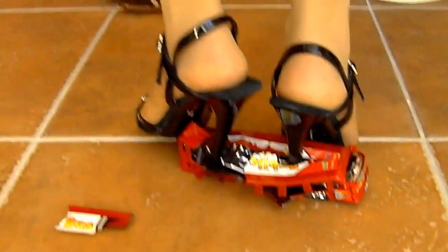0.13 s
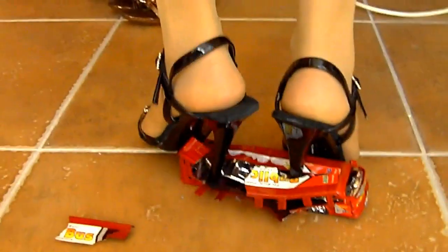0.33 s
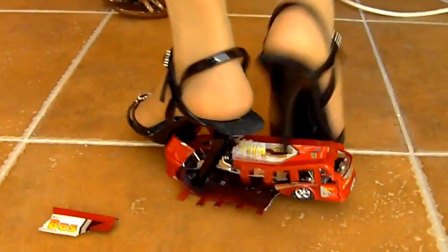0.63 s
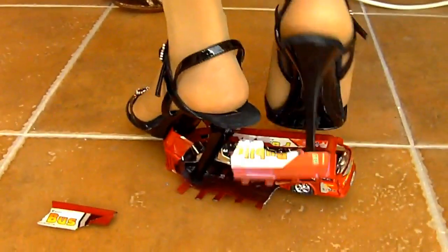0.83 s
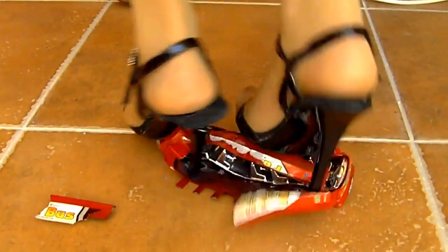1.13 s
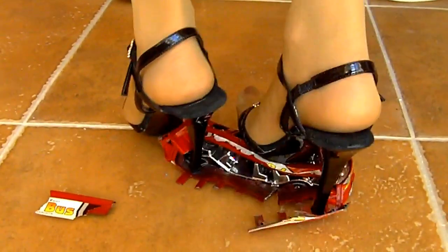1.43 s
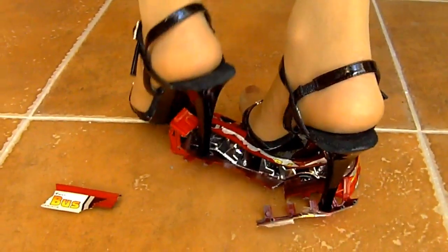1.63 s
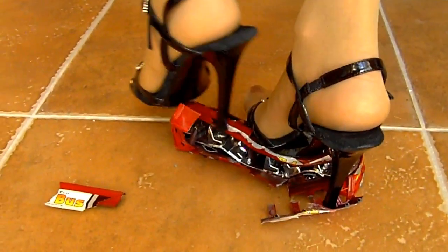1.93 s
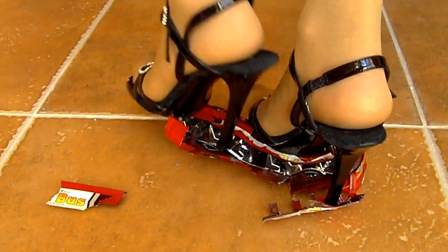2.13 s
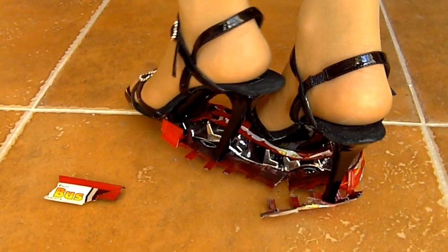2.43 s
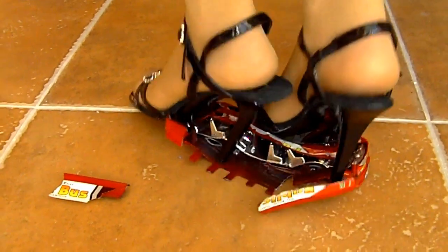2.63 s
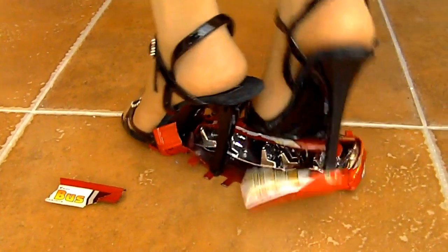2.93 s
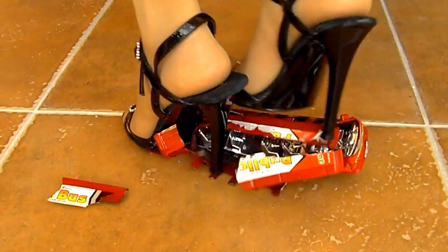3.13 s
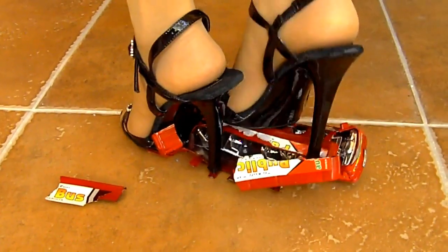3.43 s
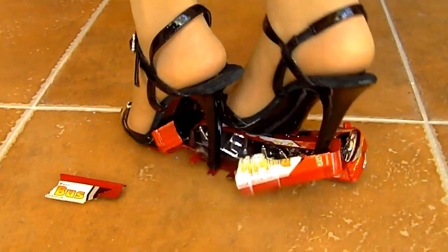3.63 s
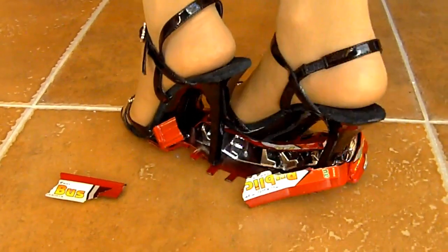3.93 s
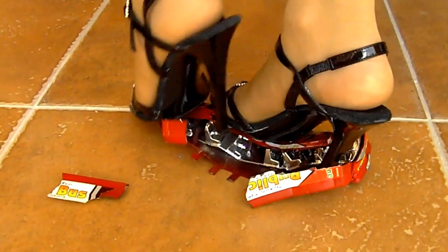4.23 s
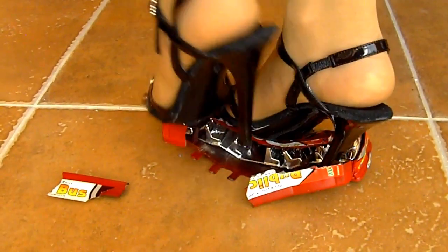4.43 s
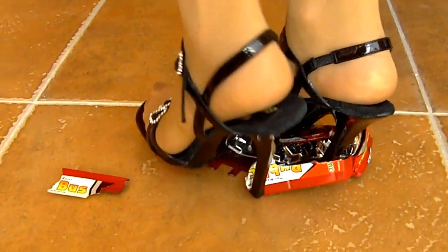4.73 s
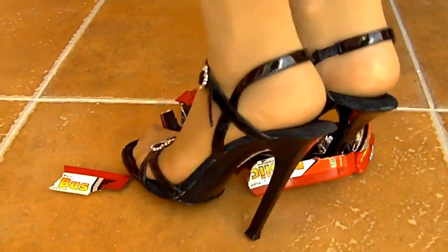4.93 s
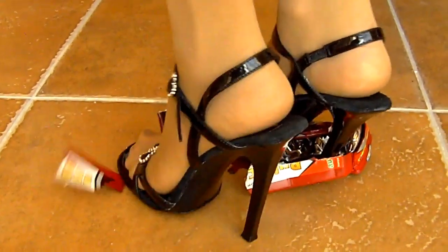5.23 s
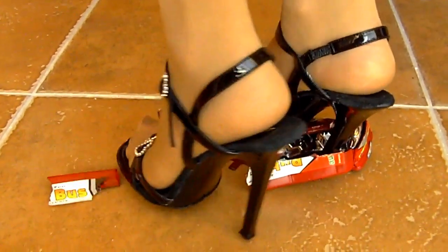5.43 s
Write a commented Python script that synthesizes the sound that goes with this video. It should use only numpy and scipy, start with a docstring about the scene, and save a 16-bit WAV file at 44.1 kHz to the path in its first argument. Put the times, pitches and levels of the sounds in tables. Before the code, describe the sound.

Over a faint mains buzz and fading room ring, a hollow plastic toy is crushed by high heels on tiles. Very loud, clipped cracks burst out near the start, then creaks and smaller snaps, another violent cluster midway, and dwindling crackles. A shoe knocks the floor late and a loose piece skids briefly. Close microphone, bare reverberant room, dull top end.

```python
"""A dying room ring is heard first, over a faint mains buzz; then high-heeled shoes tread a hollow plastic
toy bus to pieces on a tiled floor, close by. Stick-slip makes the shell creak, and sudden stress release
makes it crack, exciting its modes; the loudest cracks overload the input stage. Pieces scrape by random
friction, shoes knock as struck modal bodies, and the bare room answers with echoes and about a second of ring."""
import sys
import numpy as np
from scipy import signal
from scipy.fft import rfft, irfft, next_fast_len
from scipy.io import wavfile

SR = 44100
rng = np.random.default_rng(int(sys.argv[2]) if len(sys.argv) > 2 else 0)


def materialize(psi):
    """Save the field psi as 16-bit PCM at rate SR to the path in sys.argv[1].

    A 1-D psi becomes a single channel; in a 2-D psi each row is a channel.
    """
    bounded = np.clip(np.atleast_2d(psi).T, -1, 1)
    quanta = np.round(bounded * 32767).astype(np.int16)
    wavfile.write(sys.argv[1], SR, quanta)


N = 246078
TAPS = 4096  # length of filters and single blows [samples]
HZ = np.fft.rfftfreq(TAPS, 1 / SR)  # frequency grid of the filters
TIME = np.arange(N) / SR
BLOW_TIME = np.arange(TAPS) / SR

# Spectrum of a crack: (frequency [Hz], gain [dB])
CRACK_COLOUR = [(40, -24), (130, -23), (300, -14), (600, -8.5), (1200, -0.5), (2300, 5.5), (5000, 1),
                (9000, -24.5)]
# Modes of the plastic shell: (frequency [Hz], strength [dB], 60 dB decay time [s])
SHELL_MODES = [(890, -11, 0.032), (1278, 3.5, 0.13), (1472, 2, 0.1), (1750, 2, 0.025), (1940, -3, 0.036),
               (2260, 0.5, 0.019), (2340, 8, 0.027), (2620, -28, 0.01), (3216, 18, 0.046),
               (3530, 15.5, 0.031), (3870, -8, 0.0046), (4780, -5.5, .018), (5000, -7, 0.015)]
# Response of the microphone: (frequency [Hz], gain [dB])
MICROPHONE_GAIN = [(20, 4), (5000, -3), (5450, -5), (5950, -11), (6400, -43), (6900, -68.5), (8000, -85)]


def amp(db):
    """Level law: converts decibels to an amplitude ratio."""
    return 10 ** (np.asarray(db) / 20)


def evened(x):
    """Power normalization: scales to rms 1."""
    return x / np.sqrt(np.mean(x ** 2) + 1e-20)


def blow(x):
    """Energy normalization: scales to the energy of one millisecond at rms 1."""
    return x / np.sqrt(np.sum(x ** 2) * 1000 / SR)


def blow_at_microphone(x):
    """Energy normalization as for a blow, but of the part that passes the microphone."""
    return x * np.sqrt(SR / 1000) / np.linalg.norm(microphone(x))


def impulse():
    """Impulsive excitation: one sample, equally strong at all frequencies."""
    return blow(1. * (BLOW_TIME == 0))


def noise_burst(fade_s):
    """Irregular excitation: noise whose amplitude decays exponentially."""
    return blow(rng.standard_normal(TAPS) * np.exp(-BLOW_TIME / fade_s))


def read(points, hz):
    """Interpolation of (frequency [Hz], value) points on a logarithmic frequency axis."""
    f, value = np.transpose(points)
    return np.interp(np.log(hz + 1), np.log(f + 1), value)


def add(mix, s, sound):
    """Superposition: mixes a sound in from time s."""
    part = mix[max(round(s * SR), 0):][:len(sound)]
    part += sound[:len(part)]


def coloured(x, db):
    """Minimum-phase filtering: a causal response with the gains db on the HZ grid."""
    cepstrum = irfft(np.log(amp(db)))
    # folding the cepstrum onto positive times makes the response causal
    cepstrum[1:TAPS // 2] *= 2
    cepstrum[TAPS // 2 + 1:] = 0
    response = irfft(np.exp(rfft(cepstrum)))
    return signal.oaconvolve(x, response)[:len(x)]


def ring(modes, spread):
    """Modal superposition: damped cosines whose strengths and pitches vary from blow to blow."""
    hz, db, t60 = np.transpose(modes)[:, :, None]
    strength, detune = rng.standard_normal((2, len(modes), 1))
    decay = amp(db - 60 * BLOW_TIME / t60)
    wave = np.cos(2 * np.pi * hz * (1 + 0.0061 * detune) * BLOW_TIME)
    return blow(((1 + spread * strength) * decay * wave).sum(0))


def resonance(hz, width_octaves=0.23):
    """Resonance of one piece of plastic: a Gaussian peak in log frequency, 0 to 1."""
    return np.exp(-.5 * (np.log2((HZ + 1) / hz) / width_octaves) ** 2)


def friction(colour, grains_per_s, uneven_db):
    """Random micro-slip: tiny slips of either sign as plastic moves over the tiles, at rms 1."""
    size = amp(uneven_db * np.minimum(rng.exponential(1, N), 4))
    slips = (rng.random(N) < grains_per_s / SR) * rng.choice([-1, 1], N) * size
    return evened(coloured(slips, read(colour, HZ)))


def microphone(x):
    """Zero-phase band limitation: a speech band with a steep treble cut, symmetric in time."""
    size = next_fast_len(len(x) + TAPS)
    gain = amp(read(MICROPHONE_GAIN, np.fft.rfftfreq(size, 1 / SR)))
    return irfft(rfft(x, size) * gain, size)[:len(x)]


def electronics(buzz_db=-47, pulse_s=0.0004, hiss_db=-62):
    """Periodic interference: one two-sided exponential pulse per mains cycle, over a soft hiss."""
    # Spectrum of the hiss: (frequency [Hz], gain [dB])
    hiss_colour = [(20, -3.5), (60, -10.5), (200, 3.5), (400, -9), (1500, -10.5), (4500, -11), (9000, -29)]
    mains_hz, first_s = 59.95, .0034
    offset = (((TIME - first_s) * mains_hz + .5) % 1 - .5) / mains_hz  # time from the nearest pulse
    pulses = np.exp(-abs(offset) / pulse_s)
    buzz = amp(buzz_db) * (pulses - pulses.mean())
    hiss = evened(coloured(rng.standard_normal(N), read(hiss_colour, HZ)))
    return buzz + amp(hiss_db) * hiss


def room_tail(build_s=0.027):
    """Diffuse reverberation: dense reflections build up and die away, each band at its own rate."""
    # Decay of the room: (frequency [Hz], 60 dB decay time [s])
    decay_times = [(150, 0.76), (400, 0.93), (1000, 1.1), (2500, 0.82), (5500, 0.78)]
    # Strength of the tail: (frequency [Hz], level against the direct sound before T60 and build-up act [dB])
    tail_levels = [(100, -3.5), (220, -11), (500, -10), (1100, -12), (2100, -10.5), (3300, -11.5),
                   (5500, -14)]
    hz, t, z = signal.stft(rng.standard_normal(SR * 5 // 4), SR, nperseg=256)
    t60 = read(decay_times, hz)[:, None]
    level = read(tail_levels, hz)[:, None] - 60 * t / t60
    tail = signal.istft(z * amp(level), SR, nperseg=256)[1]
    onset = 1 - np.exp(-(np.arange(len(tail)) / SR / build_s) ** 2)
    return tail * onset * np.sqrt(2 * np.log(1000) / SR)  # unit energy for a 1 s decay at 0 dB


def room(near, far, scatter_db=-12, scatter_s=0.0069, scatter_start_s=0.0032,
         legs_db=-10, legs_s=0.0052, legs_width_s=0.00062):
    """Reflection and scattering: near echoes, a rough one off the legs, furniture scatter, long ring."""
    # Echoes off the floor and things nearby: (delay [s], level [dB])
    near_echoes = [(.0009, -36), (.0043, -19), (.0050, -23), (.0064, -31), (.0082, -19.5)]
    out = near.copy()
    for delay, db in near_echoes:
        add(out, delay, amp(db) * near)
    for beam in far:
        scatter = rng.standard_normal(TAPS) * np.exp(-BLOW_TIME / scatter_s)
        scatter *= BLOW_TIME > scatter_start_s
        legs = rng.standard_normal(TAPS) * np.exp(-.5 * ((BLOW_TIME - legs_s) / legs_width_s) ** 2)
        early = amp(scatter_db) * scatter / np.linalg.norm(scatter)
        early += amp(legs_db) * legs / np.linalg.norm(legs)
        paths = room_tail()
        add(paths, 0, early)
        out += signal.fftconvolve(beam, paths)[:N]
    return out


def earlier_ring(db=-43):
    """Free decay: the room is still ringing from a crack a moment before."""
    tail = coloured(microphone(room_tail()), read(CRACK_COLOUR, HZ))
    tail = tail[SR // 10:]  # the first 0.1 s has already passed
    out = np.zeros(N)
    add(out, 0, amp(db) * tail / tail[:TAPS].std())
    return out


def thuds(hz=85, width_octaves=1.0, fade_s=.014):
    """Overdamped impact: a foot takes the weight with a soft, low push that does not ring."""
    # Weight coming down on the floor: (time [s], level [dB])
    footfalls = [(0.293, -43), (2.628, -26.5), (3.581, -33.5)]
    out = np.zeros(N)
    colour = np.maximum(-3 * (np.log2((HZ + 1) / hz) / width_octaves) ** 2, -60)
    for s, db in footfalls:
        add(out, s, amp(db) * blow(coloured(noise_burst(fade_s), colour)))
    return out


def steps(click_db=-4, click_s=0.013, low_hz=80):
    """Contact-limited impact: sole and heel modes knock on the tiles, dulled by a soft contact."""
    # Blows of a shoe: (time [s], level [dB], frequency above which the contact dulls it [Hz])
    shoe_blows = [(2.643, -19.5, 1500), (3.5827, -35, 400), (4.624, -42, 900), (4.809, -34.5, 600),
                  (4.845, -15, 1800), (5.5429, -25.5, 2500)]
    # Modes of the shoe: (frequency [Hz], strength [dB], 60 dB decay time [s])
    shoe_modes = [(110, -30.5, .06), (195, -2, 0.017), (370, 5.5, 0.0083), (558, 8, 0.03),
                  (816, 5.5, 0.0053), (1277, 7, 0.055), (1950, 13, 0.0042)]
    out = np.zeros(N)
    low_loss = 1 + (low_hz / (HZ + 1)) ** 2  # a small heel radiates little bass
    for s, db, dull_hz in shoe_blows:
        knock = ring(shoe_modes, spread=0.18) + amp(click_db) * noise_burst(click_s)
        contact_loss = 1 + (HZ / dull_hz) ** 2
        add(out, s, amp(db) * blow(coloured(knock, -10 * np.log10(contact_loss * low_loss))))
    return out


def skating(ramp_s=.02):
    """Sliding friction: a kicked panel sets off quickly, slows down on the glaze and stops."""
    # Slides of the loose panel: (start [s], level [dB], fade [dB/s], length [s])
    slides = [(3.285, -44.5, 51, 0.18), (5.264, -47, 72.5, 0.115)]
    # Spectrum of the slide: (frequency [Hz], gain [dB])
    slide_colour = [(500, -27), (1500, -27), (2800, -3), (4400, 11), (5200, -2.5), (9000, -27)]
    speed = np.zeros(N)
    for start, db, fade, length in slides:
        t = np.arange(0, length, 1 / SR)
        ends = np.minimum(np.minimum(t, length - t) / ramp_s, 1)
        add(speed, start, ends * amp(db - fade * t))
    return speed * friction(slide_colour, grains_per_s=4400, uneven_db=8.5)


def grinding(steepness=5.0):
    """Sliding friction: each stroke of a sole swells and dies symmetrically; the shorter, the more abrupt."""
    # Plastic dragged under a sole: (middle [s], length between half-amplitude points [s], level [dB])
    strokes = [(0.491, .03, -50), (1.18, .12, -35.5), (1.43, .04, -47), (1.779, .03, -38),
               (2.189, .05, -42.5), (2.354, .09, -49), (3.556, .06, -42.5), (3.74, .12, -46),
               (3.994, .05, -55), (4.62, .15, -38), (4.812, .028, -19.5), (4.861, .08, -52),
               (5.56, 0.049, -47)]
    # Spectrum of the drag: (frequency [Hz], gain [dB])
    drag_colour = [(60, -21), (200, -3), (750, -13.5), (1220, 3), (1600, 2), (2300, 3.5), (3500, -2),
                   (5000, -1), (9000, -7.5)]
    speed = np.zeros(N)
    for middle, length, db in strokes:
        speed += amp(db) / (1 + abs(2 * (TIME - middle) / length) ** steepness)
    return speed * friction(drag_colour, grains_per_s=1300, uneven_db=0.0)


def creaks(uneven_db=4.0, shell_db=-10, rub_db=-1, rub_s=.0012,
           spot_hz=2300, spot_octaves=0.73, spot_db=7, wall_hz=1180):
    """Stick-slip: plastic catches and slips on plastic; each slip rubs a new spot and rings the shell."""
    # Creaks of the loaded shell: (start [s], end [s], level of a slip [dB], slip rate [1/s],
    # looseness of the pace [std of log interval], ring of the side wall [dB])
    creak_runs = [(1.416, 1.441, -25, 150, 0.15, 0), (2.153, 2.23, -34.5, 86, 0.29, 10),
                  (2.289, 2.382, -26, 140, .12, 7), (2.379, 2.465, -33.5, 110, 0.22, -8),
                  (2.533, 2.572, -29.5, 110, 0.21, 6), (2.574, 2.588, -27.5, 420, 0.23, 10),
                  (3.464, 3.547, -35, 113, 0.23, 8), (3.781, 3.83, -42, 140, 0.18, -2),
                  (3.873, 3.975, -28.5, 43.6, 0.014, 10), (3.97, 4.05, -32, 66, 0.22, 1.5),
                  (4.1, 4.148, -27.5, 220, .12, 5.5), (4.152, 4.195, -24, 64, .03, 17.5),
                  (4.521, 4.62, -32, 142, 0.26, 8), (4.721, 4.777, -32, 155, 0.099, -3)]
    # Spectrum of a slip: (frequency [Hz], gain [dB])
    creak_colour = [(100, -31), (700, -15), (1220, -7), (1550, -3), (1950, -2.5), (2600, 2.5), (3300, -3),
                    (5000, -2), (9000, -9)]
    out = np.zeros(N)
    for start, end, db, rate, loose, wall_db in creak_runs:
        wait, size, spot = rng.standard_normal((3, 24))  # at most 24 slips
        gaps = np.exp(loose * wait) / rate
        times = start + np.cumsum(gaps) - gaps
        knock = impulse() + amp(shell_db) * ring(SHELL_MODES, spread=0.65)
        colour = read(creak_colour, HZ) + read(MICROPHONE_GAIN, HZ) + wall_db * resonance(wall_hz)
        for k in np.flatnonzero(times < end):
            force = knock + amp(rub_db) * noise_burst(rub_s)
            spot_ring = spot_db * resonance(spot_hz * 2 ** (spot_octaves * spot[k]))
            slip = blow(coloured(force, colour + spot_ring))
            add(out, times[k], amp(db + uneven_db * size[k]) * slip)
    return out


def cracks(shell_db=-13, splinter_db=3, splinter_s=0.001, onward_db=3):
    """Sudden stress release: a snap and splinters ring the shell and the freed piece.
    Gives the sound at the microphone and what goes out into the room in three directions."""
    # Cracks of the shell: (time [s], level [dB], pitch of the freed piece [Hz], its ring [dB],
    # hollow-body gain, 0.99 of it below 700 Hz [dB], sharp-edge gain, 0.9 of it above 4200 Hz [dB])
    breaks = [(0.1403, -34, 4340, 10.5, 2, -9), (0.4929, -32.5, 2460, 10, 5, -6),
              (0.5108, 4, 2260, 3, 1.5, 4.5), (0.5134, -0.5, 2250, 0.5, 0.5, 0.5),
              (0.5175, -3.5, 2300, 7, 0, -9), (0.679, -22, 960, 13, 0, -9), (0.9898, -1, 2920, 14, 6, 3),
              (0.9922, 1, 2000, 10, -2, 5.5), (1.075, -1.5, 1970, 6.5, -2, 3),
              (1.1459, -14.5, 2520, 23, 0, -2), (1.1597, -9, 1790, 10.5, -3.5, -2.5),
              (1.2625, -19, 1920, 9, 4.5, -1.5), (1.3393, -13, 930, 7, -5, -12),
              (1.3728, -27, 2430, 3, 2, 4), (1.3916, -12, 3380, 6, -4.5, -6),
              (1.4465, 2.5, 1730, 13.5, -13.5, 7), (1.45, 2, 1780, 8.5, -1, 4),
              (1.4549, -2.5, 2260, 8, 4, 0), (1.8172, -28, 2260, 8.5, 8.5, 10.5),
              (1.943, -21.5, 2010, 3, -9, 3.5), (2.0557, -25, 1770, 10, 0, 5),
              (2.1012, -26, 2110, 14, 6.5, 12.5), (2.1671, -22.5, 5100, 9, -7, -6.5),
              (2.206, -26, 2520, 13, 12.5, 3), (2.272, -30, 2260, 8, 1.5, 9),
              (2.3172, -10.5, 2800, 5.5, -4, -7.5), (2.3866, -20.5, 1830, 16, -12, 2),
              (2.4063, -24.5, 750, 2, -22, -6), (2.443, -25, 1680, 8.5, -3.5, -5.5),
              (2.5847, -2, 3230, 9.5, 4, 1), (2.622, 1.5, 2870, 8, 2.5, 3.5),
              (2.644, 2.5, 1700, 8.5, 7.5, 10.5), (2.647, -3, 1680, -12, 4.5, 8.5),
              (2.651, -1.5, 3230, 8, -7, 2.5), (2.6669, -8.5, 1517, 8.5, -4, -5.5),
              (2.6715, -10, 2140, 16, 5, 7.5), (2.7268, -15, 1590, 1, 9, -3),
              (2.7954, -10, 1220, 17, 9.5, 3.5), (2.9192, -21.5, 880, 11, -5, -8),
              (3.0129, -18, 1260, 8.5, 9.5, -2), (3.2137, -33.5, 4670, 15, 10, -13),
              (3.2725, -12.5, 2680, 9, 4.5, 5.5), (3.3116, -30, 1470, 15, 8, 20.5),
              (3.5517, -24.5, 1180, 16.5, 6, 7), (3.5603, -23.5, 1730, 9.5, 9, 20),
              (3.5814, -16, 2480, 9, 4, 6.5), (3.6166, -29, 2460, -1, 0, 3), (3.67, -26, 1710, 10, 15, 13),
              (3.697, -27, 2380, 1.5, -12, -3), (3.7322, -25.5, 1060, 5, 3, -6),
              (3.7591, -8.5, 2350, 9, 0.5, 10.5), (3.832, -17.5, 2530, 9, 1, 10.5),
              (4.0718, -28.5, 1130, 6, -4, 1), (4.2024, -16, 3400, 7, -7, -6.5),
              (4.2277, -21.5, 1180, 18.5, 0, -2), (4.2957, -21, 1180, 12.5, -4, -3.5),
              (4.3934, -21.5, 1180, 7, -3, -6), (4.4044, -28.5, 2320, 16.5, 8, 4),
              (4.4418, -28, 1040, 15, -12, -12.5), (4.6049, -21.5, 1060, 13.5, 11.5, 4.5),
              (4.624, -14.5, 1270, 13.5, 1.5, 5), (4.771, -19, 1260, 14.5, -4.5, 2),
              (4.807, -14, 1370, -1.5, -2.5, -4.5), (4.813, -22.5, 1440, 15.5, 16, -8),
              (4.82, -15.5, 2060, 7.5, 4.5, 2), (4.8645, -25, 1980, 6.5, 13, 3),
              (4.889, -18, 2240, 23, 16.5, 1.5), (5.0092, -34.5, 2460, 5.5, 6.5, 9),
              (5.2258, -34, 2030, 8, 9, -12.5), (5.2575, -34.5, 1560, 9, 4, 7),
              (5.2786, -31, 3770, 3.5, 9.5, 13.5), (5.5649, -26.5, 786, 10, 2, -0.5)]
    near, far = np.zeros(N), np.zeros((3, N))
    snap = impulse()
    body = read([(700, 0.99), (1600, 0.0081)], HZ)
    edge = read([(2200, 0.018), (4200, 0.9)], HZ)
    for k, (s, db, hz, ring_db, body_db, edge_db) in enumerate(breaks):
        force = snap + amp(splinter_db) * noise_burst(splinter_s)
        force += amp(shell_db) * ring(SHELL_MODES, spread=1.0)
        piece = ring_db * resonance(hz)
        colour = read(CRACK_COLOUR, HZ) + body_db * body + edge_db * edge
        add(near, s, amp(db) * blow_at_microphone(coloured(force, colour + piece)))
        # summed over all directions the piece's peak or dip evens out
        onward = blow_at_microphone(coloured(snap, colour + piece / 2))
        add(far[k % len(far)], s, amp(db + onward_db) * onward)
    return near, far


def scene():
    """Superposition of toy and shoes in the room with the earlier ring and the electronics."""
    near, far = cracks()
    underfoot = steps() + thuds() + creaks() + grinding() + skating()
    in_room = room(near + underfoot, far + underfoot / 2)
    return (in_room + earlier_ring() + electronics())[None]


def record(dry):
    """Band limitation and saturation: microphone, an input stage that clips loud cracks, output filters."""
    # Response after the input stage: (frequency [Hz], gain [dB])
    output_gain = [(20, 4), (5200, -1.5), (7000, -10), (10000, -11.5), (16000, -10.5)]
    ceiling, edge_hz = .72, 16400
    x = microphone(dry[0])
    x = x / (1 + (x / ceiling) ** 20) ** (1 / 20)  # nearly linear up to the ceiling
    x = coloured(x, read(output_gain, HZ))
    band_limit = signal.firwin(511, edge_hz, window=("kaiser", 9), fs=SR)
    return signal.oaconvolve(x, band_limit, "same")[None]


dry = scene()
out = record(dry)
materialize(out)
```